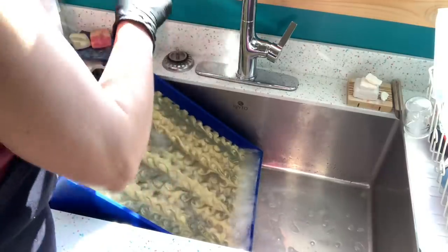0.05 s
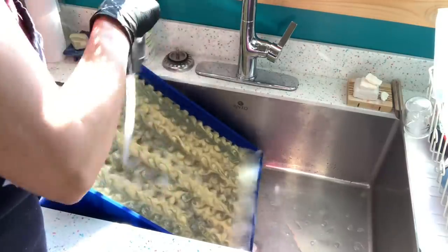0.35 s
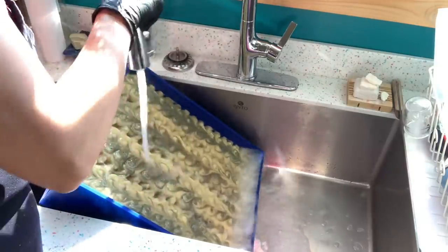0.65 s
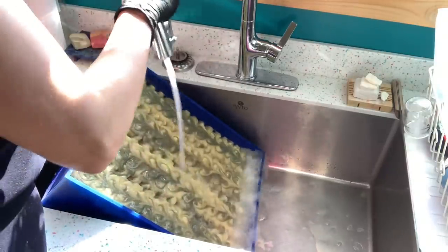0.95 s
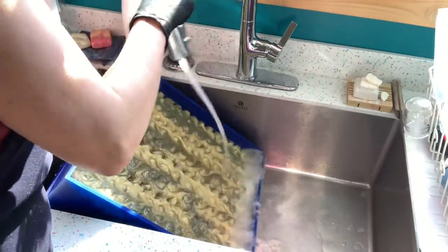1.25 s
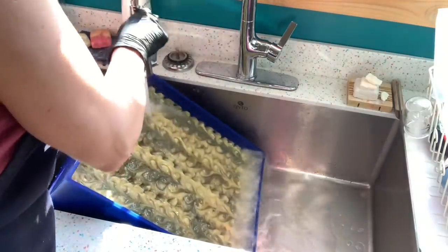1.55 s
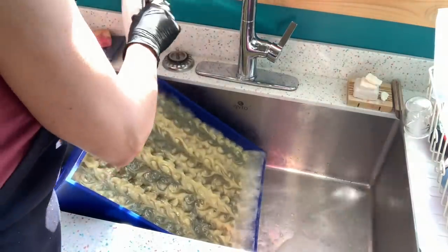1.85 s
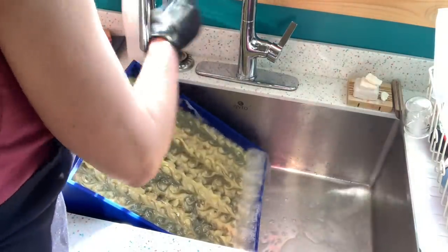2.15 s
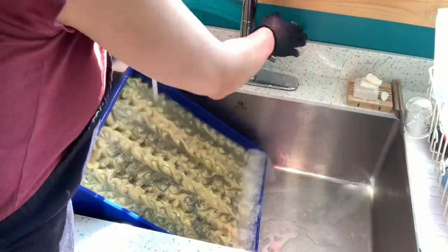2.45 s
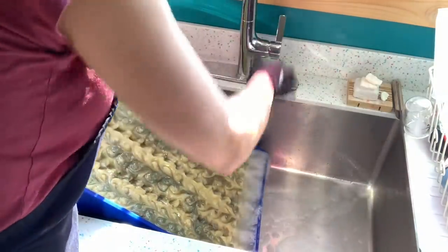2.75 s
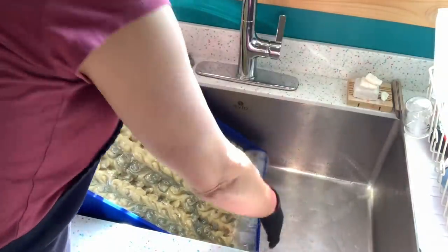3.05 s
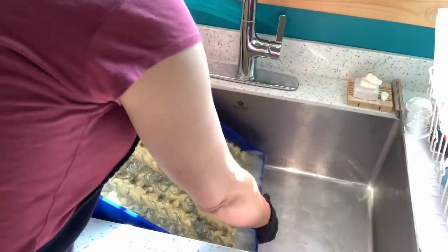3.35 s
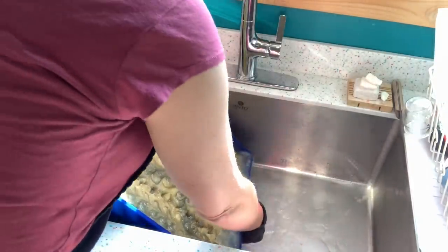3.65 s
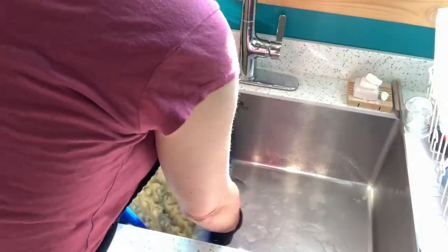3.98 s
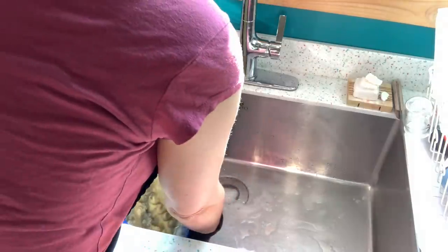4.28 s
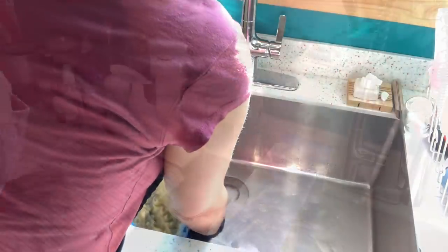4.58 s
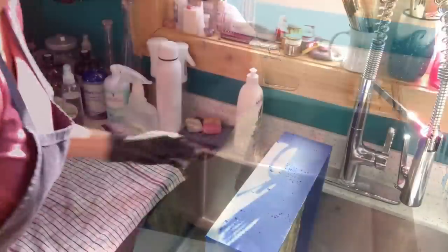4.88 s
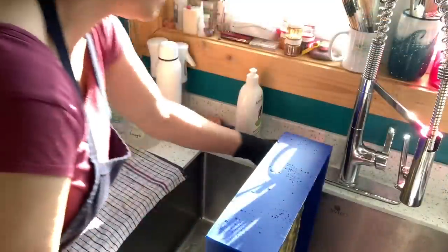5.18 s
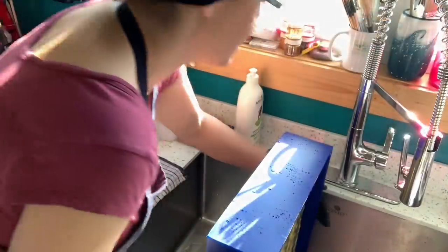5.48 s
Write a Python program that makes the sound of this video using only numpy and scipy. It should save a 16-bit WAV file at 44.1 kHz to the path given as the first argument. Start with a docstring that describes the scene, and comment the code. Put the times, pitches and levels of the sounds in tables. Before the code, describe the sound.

Close up in a small kitchen, fine jets of water hiss and spit on wet soap in a tray inside a steel sink. A sharp clunk marks the sprayer being docked, then the tap closes with a thud and the flow breaks into drips. Quieter handling follows: the plastic tray bumps the basin, tips off a short pour of water and knocks again, over faint glove rubbing and room noise.

```python
"""Water fizzes and splatters as a pull-down sprayer rains on a soap loaf in a plastic tray in a steel sink.
The drops keep tray and basin ringing. The spray head clunks into its dock, the tap thumps shut
and the hose dribbles dry. The tray is shifted and tipped: its water gushes off, then it knocks
against the sink. Behind it: wet gloves, bursting suds and the rumble and hiss of a small kitchen."""
import sys
import numpy as np
from scipy import signal
from scipy.fft import rfft, irfft, next_fast_len
from scipy.io import wavfile
from scipy.ndimage import uniform_filter1d

SR = 44100
rng = np.random.default_rng(int(sys.argv[2]) if len(sys.argv) > 2 else 0)


def bounce(signal):
    """Save signal as a 16-bit WAV file at the path given by the first command-line argument."""
    frames = np.transpose(np.atleast_2d(signal))
    limited = np.clip(frames, -1, 1)
    pcm = np.round(limited * 32767).astype(np.int16)
    wavfile.write(sys.argv[1], SR, pcm)


N = 247842
TIME = np.arange(N) / SR
BINS_HZ = np.fft.rfftfreq(4096, 1 / SR)
SHUT_S, BREAK_S = 2.557, 2.67  # tap closes, jet breaks up
PORT_GAP_S = 0.00019  # travel time between the two microphone ports

# Fine jets on soap: freq_hz, level_db
FIZZ_SPECTRUM = [(1500, -18.5), (2600, -35.5), (3600, -1.5), (5000, -8.5), (6200, -2), (8000, 4.5),
                 (10000, 1), (12000, 3.6), (13500, -1.5), (15000, 3.5), (16000, -4.5)]
# Bigger drops in the basin: freq_hz, level_db
SPLATTER_SPECTRUM = [(250, -12.5), (680, -7.5), (850, -1), (1150, -4), (1600, -2), (2400, -3.7),
                     (3200, 3.5), (4000, 5.3), (5300, 1.5), (6500, 1), (9000, -22.5), (16000, -15.5)]
# Faint narrow peaks colouring the spray's hiss: pitch_hz, width_hz, level_db
SPRAY_PEAKS = [(3770, 81, -29.5), (4570, 68, -10), (5460, 30, 0.5), (7060, 59, -12), (8400, 62, -2)]
# Jet swept over the soap and back to the dock: time_s, level_db
JET_SWEEP = [(0, -45.5), (.45, -45), (.7, -43), (1.2, -43), (1.27, -45), (1.385, -39.5), (1.46, -45),
             (1.62, -47.5), (2.1, -48), (2.55, -47)]
def spray():
    """Fine jets fizz on the wet soap; bigger drops splatter inside the basin."""
    peaks = sum(amp(db) / (1 + (2 * (BINS_HZ - hz) / width_hz) ** 2) for hz, width_hz, db in SPRAY_PEAKS)
    peak_db = 20 * np.log10(1 + peaks)
    fizz = patter(per_s=3500, spread_db=1.5, wash=1, clump_db=1, clump_hz=14)
    fizz = colour(fizz, curve(FIZZ_SPECTRUM) + peak_db)
    splatter = patter(per_s=1200, spread_db=2, wash=1, clump_db=1, clump_hz=3.7)
    splatter = colour(splatter, curve(SPLATTER_SPECTRUM) + peak_db)
    sweep_db = np.interp(TIME, *np.transpose(JET_SWEEP))
    rim_db = 3.7 * np.exp(-((TIME - 1.47) / 0.1) ** 2)  # jet crosses the tray's rim
    fizz = wander(fizz, depth_db=2, patch_hz=885, patch_s=0.049)
    fizz *= amp(sweep_db + 5.5) * flow() ** 0.97
    splatter = wander(splatter, depth_db=3.5, patch_hz=403, patch_s=0.045)
    splatter *= amp(-46.5 + 0.18 * (sweep_db - sweep_db[0]) + rim_db) * flow(lead_s=0.0063)
    return (place(fizz, lag_ms=0.2656, wet_db=-13, left_db=0)
            + place(splatter, lag_ms=-0.14, wet_db=-1, left_db=2))


def flow(lead_s=0):
    """Jet gain: full until the tap shuts, then it weakens and breaks."""
    shut_db_per_s, break_db_per_s = 105, 400
    return amp(-shut_db_per_s * since(SHUT_S - lead_s) - break_db_per_s * since(BREAK_S))


# Water breaking on an edge: start_s, level_db, centre_hz, width_oct, t60_s
EDGE_SPITS = [(0.121, -49, 2020, .6, 0.05), (.781, -51.5, 2000, 0.43, 0.054),
              (0.974, -37.5, 4400, 0.94, 0.086), (1.288, -42.5, 1940, 1.1, 0.15),
              (1.319, -31, 4800, 0.9, 0.1), (1.388, -37.5, 1900, 2.9, 0.12),
              (1.393, -47.5, 8000, 0.66, 0.052), (1.442, -45, 4100, 0.41, .06),
              (1.503, -34.5, 3630, 0.55, 0.07), (4.056, -68, 3200, 0.8, .07)]
def spits(rise_s=0.002, droplets_per_s=3000):
    """A slug of water bursts into a tight cluster of droplets that dies quickly."""
    out, t = np.zeros(N), np.arange(SR // 5) / SR
    for start_s, level_db, centre_hz, width_oct, t60_s in EDGE_SPITS:
        droplets = rng.standard_normal(len(t)) * (rng.random(len(t)) < droplets_per_s / SR)
        cluster = unit_rms(colour(droplets, hump(centre_hz, width_oct)))
        add(out, start_s, cluster * amp(level_db - 60 * t / t60_s) * (1 - np.exp(-t / rise_s)))
    return place(out, lag_ms=0.071, wet_db=-14, left_db=1.5)


# Single large drops: start_s, level_db, centre_hz, width_oct
LARGE_DROPS = [(0.366, -23.5, 10800, 0.43), (0.460, -23, 9550, 0.5), (0.577, -21.5, 10400, 0.6),
               (.637, -24, 9000, .7), (1.039, -25.5, 7040, 0.68), (1.143, -40, 8400, 0.37),
               (1.28, -25, 9000, 1), (1.308, -24, 8500, 1), (1.340, -23, 9500, 1), (1.362, -25.5, 7700, 1),
               (1.386, -21.5, 8200, 0.77), (2.103, -30.5, 8000, 0.48), (2.725, -50, 4240, 0.13),
               (2.739, -49, 4400, .12), (2.841, -44, 8100, .12), (2.856, -47, 4560, .1),
               (2.921, -43, 8500, 0.089), (2.959, -48, 8500, .1), (3.014, -44.5, 10300, 0.11),
               (3.049, -49, 11400, 0.21), (3.147, -61, 7850, 0.16), (3.245, -53.5, 8150, 0.37),
               (3.833, -50, 8000, 0.27), (3.871, -46, 8000, 0.48), (3.902, -45, 8200, 0.063),
               (3.913, -60, 1910, 0.18), (3.949, -55, 2150, 0.1), (4.027, -53, 7500, .15),
               (4.039, -53, 1710, 0.31), (4.08, -53, 8500, .5), (4.167, -57, 7900, .2),
               (4.257, -60, 9200, .15), (4.324, -60.5, 8300, 0.29)]
def drops():
    """Large drops snap on the wet soap; the narrow-band ones plink like a trapped bubble."""
    out = np.zeros(N)
    for start_s, level_db, centre_hz, width_oct in LARGE_DROPS:
        add(out, start_s, click(level_db, centre_hz, width_oct, t60_s=0.016))
    return place(out, lag_ms=0.267, wet_db=-10, left_db=0)


# Modes of the sink with the tray in it: pitch_hz, level_db, t60_s
SINK_MODES = [(46, -5, 0.25), (69.9, 2.5, 0.26), (91.1, -2.5, 0.49), (110.3, -10, 0.19), (140.4, 3, 0.24),
              (175.7, 1, 0.15), (200.7, 1.5, 0.24), (265, -7.5, 0.13), (323.4, -5.5, 0.31),
              (336, -0.5, 0.076), (471.4, 4.5, 0.24), (527, -18.5, 0.35), (624.5, -6, 0.062),
              (837, -18.5, 0.22), (1070, -2.5, 0.091), (1216, -1.5, 0.11), (1308, -1.5, 0.1)]
def drumming():
    """Falling water keeps the sink's modes and the tray's hollow note ringing."""
    mode_power = sum(amp(db) ** 2 / (1 + ((BINS_HZ - hz) * t60_s / 1.1) ** 2)
                     for hz, db, t60_s in SINK_MODES)
    basin = patter(per_s=650, spread_db=3, wash=0.78, clump_db=0.5, clump_hz=16)
    basin = unit_rms(colour(basin, 10 * np.log10(mode_power)))
    tray = patter(per_s=290, spread_db=-1, wash=0.12, clump_db=-1.5, clump_hz=11)
    tray = unit_rms(colour(tray, hump(469, 0.11)))
    push = amp(-55) * flow() + amp(-73.5) * draining()
    return (place(basin * push, lag_ms=-0.084, wet_db=-12.5, left_db=2.5)
            + place(amp(-4.5) * tray * push, lag_ms=-0.63, wet_db=-4.5, left_db=1))


# Dull blows on the sink: start_s, level_db, centre_hz, width_oct, rise_s, rattle_db, sway_db
SINK_BLOWS = [(1.596, -43, 127, 1.3, 0.0036, 4, -14), (1.777, -32, 460, 1.1, 0.0028, -2.5, -4.5),
              (1.784, -28, 125, 1, .004, -8, -18), (1.849, -31, 149, .45, 0.0062, -4, -5),
              (1.917, -38.5, 266, 0.83, 0.0037, -1, -6), (2.503, -40, 480, .5, 0.0067, -15, -14),
              (2.553, -33.5, 376, 0.62, 0.0026, -15, -7), (2.562, -35, 202, .25, 0.0027, -3, -5),
              (2.588, -37.5, 470, 0.23, 0.0025, -13, -22), (2.645, -44.5, 183, .4, .003, -2, -1),
              (2.776, -51, 195, 0.37, 0.0095, -1.5, -14), (2.954, -49.5, 195, 0.27, 0.0092, -6, -11),
              (3.425, -41, 193, .4, 0.035, -8, -18), (3.49, -40, 123, 1.5, 0.0069, -7, -20),
              (3.603, -44.5, 159, 0.91, 0.0019, -5, -13), (4.035, -49, 189, 0.55, 0.0085, -12, -22),
              (4.198, -45, 100, 0.75, .004, -6.5, -21), (4.457, -52, 86.6, 0.48, 0.0025, -11.5, -13),
              (4.799, -50.5, 199, 0.95, 0.0024, 3.5, 0.5), (4.822, -38.5, 50.4, .7, 0.0033, 0, -20),
              (4.949, -59, 68.5, 0.89, .004, 2.5, -11)]
def thumps(sway_delay_s=0.018, sway_pitch_ratio=0.36):
    """Each blow is followed by the lower sway of the heavy basin."""
    out = np.zeros(N)
    for start_s, level_db, centre_hz, width_oct, rise_s, rattle_db, sway_db in SINK_BLOWS:
        add(out, start_s, blow(level_db, centre_hz, width_oct, rise_s, rattle_db))
        sway_hz = centre_hz * sway_pitch_ratio
        sway = blow(level_db + sway_db, sway_hz, width_oct=0.66, rise_s=rise_s, rattle_db=2)
        add(out, start_s + sway_delay_s, sway)
    return place(out, lag_ms=-0.25, wet_db=-5.5, left_db=0)


def blow(level_db, centre_hz, width_oct, rise_s, rattle_db, rattle_t60_s=0.13):
    """A blow rings the sink's modes near centre_hz and rattles loose parts."""
    t = np.arange(SR // 2) / SR
    mode_hz, mode_db, t60_s = np.transpose(SINK_MODES)[:, :, None]
    weights = amp(mode_db + hump(centre_hz, width_oct, mode_hz))
    modes = weights * amp(-60 * t / t60_s) * np.sin(2 * np.pi * mode_hz * t)
    ring = modes.sum(0) / np.linalg.norm(weights)
    rattle = unit_rms(colour(rng.standard_normal(len(t)), hump(centre_hz, 0.87)))
    rattle *= amp(rattle_db - 60 * t / rattle_t60_s)
    return amp(level_db - 5) * (ring + rattle) * (1 - np.exp(-t / rise_s))


# Contacts of spray head, lever and tray: start_s, level_db, centre_hz, width_oct, t60_s
HARD_KNOCKS = [(0.035, -38, 1500, 0.72, 0.15), (1.7723, -23.5, 7280, 0.082, .016),
               (1.773, -24, 5570, 0.65, 0.056), (1.778, -32, 7400, 0.15, 0.044),
               (1.779, -37, 1310, 0.54, 0.062), (1.916, -45, 750, 0.32, 0.078),
               (2.786, -52, 1430, 1.9, 0.036), (2.883, -41, 2700, 0.37, .008),
               (3.408, -48, 2900, 0.72, 0.23), (3.436, -53, 2240, 0.71, 0.1),
               (3.546, -53.5, 3900, .5, 0.033), (3.604, -57, 980, 0.22, 0.025),
               (3.753, -53.5, 1030, 0.28, 0.19), (4.004, -45, 1670, 0.23, 0.11),
               (4.802, -39.5, 2450, 0.75, 0.025), (4.806, -55, 3530, 0.56, .2),
               (4.983, -60, 3960, 0.29, 0.053)]
def knocks():
    """Metal and plastic parts meet at the basin's rim, near and dry."""
    out = np.zeros(N)
    for start_s, level_db, centre_hz, width_oct, t60_s in HARD_KNOCKS:
        add(out, start_s, click(level_db + 1, centre_hz, width_oct, t60_s))
    return place(out, lag_ms=-0.1, wet_db=-8, left_db=0.8)


def click(peak_db, centre_hz, width_oct, t60_s):
    """A sharp contact, then a band of decaying noise for its many close, damped modes."""
    t = np.arange(SR // 6) / SR
    envelope = amp(-60 * t / t60_s) + 2.4 * np.exp(-t / 0.0032)
    burst = colour(rng.choice([-1, 1], len(t)) * envelope, hump(centre_hz, width_oct))
    return amp(peak_db) * burst / np.abs(burst).max()


# Last water on the soap: freq_hz, level_db
DRIBBLE_SPECTRUM = [(300, -8), (700, 1), (1500, -4.5), (2400, -1.5), (3200, -1.5), (4500, -0.5), (6000, 0),
                    (8500, 2), (10500, 0.5), (13000, -5), (16000, -7)]
def dribble():
    """The hose empties onto the soap as a broken string of drops."""
    impacts = patter(per_s=250, spread_db=2.5, wash=0.89, clump_db=0, clump_hz=54)
    impacts = colour(impacts, curve(DRIBBLE_SPECTRUM))
    impacts = wander(impacts, depth_db=2.5, patch_hz=497, patch_s=0.024)
    return place(amp(-58) * impacts * draining(), lag_ms=0.17, wet_db=5, left_db=3)


def draining(sag_s=0.42, sag_db_per_s=7, empty_db_per_s=52):
    """Gain of the water left in the hose: it takes over from the jet, sags and runs dry."""
    return (1 - flow()) * amp(-sag_db_per_s * since(SHUT_S) - empty_db_per_s * since(SHUT_S + sag_s))


# Sheet of water off the tray: freq_hz, level_db
SHEET_SPECTRUM = [(100, -2), (200, 0), (330, -12), (480, -2.5), (680, -3), (810, -3), (900, 0), (1000, -3),
                  (1300, -6.5), (1500, -13.5), (1700, -9), (2200, -19), (3000, -20), (8000, -22)]
# Fine splashes on steel: freq_hz, level_db
SPLASH_SPECTRUM = [(1000, -18), (2500, -1.5), (4500, -2), (7000, -7.5), (8300, 4.5), (9800, -13),
                   (12000, -3), (16000, -12)]
def pour():
    """A sheet of water slides off the hollow, ringing tray; fine splashes come with its front."""
    sheet = patter(per_s=1200, spread_db=2.5, wash=0.64, clump_db=1, clump_hz=23)
    sheet = colour(sheet, curve(SHEET_SPECTRUM))
    tray = patter(per_s=300, spread_db=1.5, wash=0.34, clump_db=3, clump_hz=10)
    tray = amp(-1.5) * unit_rms(colour(tray, hump(799, 0.045)))
    splashes = patter(per_s=1400, spread_db=5, wash=0.66, clump_db=3, clump_hz=25)
    splashes = colour(splashes, curve(SPLASH_SPECTRUM))
    sheet = amp(4) * wander(sheet, depth_db=2.5, patch_hz=198, patch_s=0.021)
    splashes = amp(-2.5) * wander(splashes, depth_db=4.5, patch_hz=704, patch_s=0.04)
    water = (sheet + tray) * runoff() + splashes * runoff(lead_s=0.036)
    return place(water, lag_ms=-0.031, wet_db=4.5, left_db=0)


# Gushes off the tipped tray: start_s, rise_s, crest_db, ebb_db_per_s
TRAY_GUSHES = [(3.461, 0.12, -69.5, 105), (3.735, 0.26, -60, 59)]
def runoff(lead_s=0):
    """Gain of the flow off the tray: each gush swells to its crest and ebbs."""
    gain = np.zeros(N)
    for start_s, rise_s, crest_db, ebb_db_per_s in TRAY_GUSHES:
        onset_s = start_s - lead_s
        gain += ramp(onset_s, rise_s) * amp(crest_db - ebb_db_per_s * since(onset_s + rise_s))
    return gain


def drips(per_s=170, low_hz=2400, high_hz=12000, life_cycles=26, glide=0.19, candidates=2400):
    """Drips trap small bubbles, each ringing briefly with a rising pitch."""
    out, t = np.zeros(N), np.arange(1500) / SR
    for when, pitch, size, chance in rng.random((candidates, 4)):
        if chance < per_s * N / SR / candidates:
            onset_hz = low_hz * (high_hz / low_hz) ** pitch
            age = onset_hz * t / life_cycles
            pitch_hz = onset_hz * (1 + glide * np.tanh(age))
            bubble = np.sin(2 * np.pi * np.cumsum(pitch_hz) / SR) * np.exp(-2 * age)
            add(out, when * N / SR, amp(-4 * np.log(size + 0.024)) * bubble)
    return place(unit_rms(out) * dripping(), lag_ms=-0.042, wet_db=2, left_db=0.5)


def dripping(linger_s=0.027):
    """Drip gain: follows jet, dribble and gushes, and lingers after them."""
    water = amp(-68.5) * (flow() + draining()) + amp(-17.5) * runoff()
    pole = np.exp(-1 / (linger_s * SR))
    return signal.lfilter([1 - pole], [1, -pole], water)


# Wet gloves and clothes: middle_s, level_db, centre_hz, length_s
GLOVE_RUBS = [(2.922, -63.5, 5800, .11), (3.548, -74, 8100, 0.063), (3.733, -69, 4800, 0.14),
              (3.878, -66.5, 6950, 0.074), (4.05, -63.5, 3220, 0.071), (4.779, -73.5, 7400, 0.13),
              (4.79, -61, 1090, 0.035), (5.224, -81, 1390, .4), (5.221, -82.5, 7000, .3),
              (5.568, -71.5, 10130, 0.099)]
def rubs(snaps_per_s=3000, spread_db=0.5):
    """Each rub is a swell of tiny sticky snaps."""
    out = np.zeros(N)
    for middle_s, level_db, centre_hz, length_s in GLOVE_RUBS:
        n = int(length_s * SR)
        sizes = amp(spread_db * np.minimum(rng.exponential(1, SR), 4)[:n])
        chance = rng.uniform(-1, 1, SR)[:n]
        snaps = sizes * np.sign(chance) * (np.abs(chance) < snaps_per_s / SR)
        swell = unit_rms(colour(snaps, hump(centre_hz, 0.63))) * np.hanning(n)
        add(out, middle_s - length_s / 2, amp(level_db + 1.5) * swell)
    return place(out, lag_ms=-0.1, wet_db=42, left_db=3)


def foam():
    """Suds on the soap burst with faint, high ticks."""
    ticks = patter(per_s=200, spread_db=-4.5, wash=0.84, clump_db=6, clump_hz=4.2)
    ticks = unit_rms(colour(ticks, hump(8700, 1)))
    return place(amp(-81.5) * ticks, lag_ms=-0.047, wet_db=9, left_db=3)


# House rumble: freq_hz, level_db
RUMBLE_SPECTRUM = [(20, -22), (40, -3), (60, 3.5), (90, -4.5), (140, -4), (200, -5), (300, -10.5),
                   (420, -13.5), (900, -21), (3000, -67.5)]
def rumble():
    """Low, slightly wavering noise of the house."""
    noise = unit_rms(colour(rng.standard_normal(N), curve(RUMBLE_SPECTRUM)))
    return place(noise * amp(-72 + 0.5 * waver(7)), lag_ms=-0.25, wet_db=-1.5, left_db=1.5)


# Airy room hiss: freq_hz, level_db
HISS_SPECTRUM = [(150, 4), (400, -1), (800, 0), (1100, 5.5), (1800, 1), (2600, -4), (4500, -2.5),
                 (6500, -9), (9000, -19.5), (12000, -35), (16000, -18)]
def hiss(step_s=4.72, step_db=11, fade_db_per_s=6):
    """Faint diffuse hiss that steps up near the end, then eases."""
    coherence = np.clip(np.sinc(2 * BINS_HZ * PORT_GAP_S), -1, 0.98)
    mid = colour(rng.standard_normal(N), curve(HISS_SPECTRUM) + 10 * np.log10(1 + coherence))
    side = colour(rng.standard_normal(N), curve(HISS_SPECTRUM) + 10 * np.log10(1 - coherence))
    mid, side = unit_rms(mid), amp(-3) * unit_rms(side)
    level_db = -81 + step_db * ramp(step_s, 0.044) - fade_db_per_s * since(step_s) + 0.5 * waver(5)
    return unit_rms(np.array([mid + side, mid - side])) * amp(level_db)


# Kitchen reverberation: freq_hz, t60_s
KITCHEN_DECAY = [(100, 1), (500, 0.27), (2000, 0.4), (6000, 0.13), (16000, 0.052)]
def room_response(basin_db=13.5, basin_t60_s=0.029):
    """Early echoes between the steel walls over the kitchen's tail, alike at both ports in the bass."""
    hz, t, noise = signal.stft(rng.standard_normal((2, SR // 3)), SR, nperseg=256)
    coherence = np.sinc(2 * hz * PORT_GAP_S)[:, None]
    noise[1] = coherence * noise[0] + np.sqrt(1 - coherence ** 2) * noise[1]
    decay = amp(-60 * t / curve(KITCHEN_DECAY, hz)[:, None]) + amp(basin_db - 60 * t / basin_t60_s)
    decay[:, 0] = 0
    decay /= np.linalg.norm(decay, axis=1, keepdims=True)
    response = signal.istft(noise * decay, SR, nperseg=256)[1]
    response = np.array([whiten(port) for port in response])
    return response / np.linalg.norm(response[0])


def whiten(response):
    """Flattens an echo's spectrum, so it adds space but no pitch."""
    power = uniform_filter1d(np.abs(rfft(response, 16384)) ** 2, size=15)[::4]
    return colour(response, -10 * np.log10(power + 1e-9))


def place(x, lag_ms, wet_db, left_db):
    """Stereo image: the left port lags by lag_ms; the echoes shift as hands and water move."""
    phases = 2 * np.pi * (TIME + np.arange(4)[:, None] / 4) + waver(5.7) / 2
    fades = np.maximum(np.cos(phases), 0)  # equal-power crossfade of four responses
    echoes = sum(signal.oaconvolve((fade * x)[None], room_response(), axes=1)[:, :N] for fade in fades)
    size = next_fast_len(N + SR // 10)
    delay = np.exp(-2j * np.pi * np.fft.rfftfreq(size, 1 / SR) * lag_ms / 1000)
    left = irfft(rfft(x, size) * delay, size)[:N]
    stereo = (np.array([left, x]) + amp(wet_db) * echoes) / np.hypot(1, amp(wet_db))
    return stereo * amp([[left_db / 2], [-left_db / 2]])


def patter(per_s, spread_db, wash, clump_db, clump_hz):
    """Uneven droplet impacts over a wash of countless tiny ones, swelling in clumps."""
    sizes = amp(spread_db * np.minimum(rng.exponential(1, N), 5)) * rng.choice([-1, 1], N)
    impacts = unit_rms(sizes * (rng.random(N) < per_s / SR))
    return (impacts + wash * rng.standard_normal(N)) * amp(clump_db * waver(clump_hz))


def wander(x, depth_db, patch_hz, patch_s):
    """Each spot the water hits has its own colour: random patches over time and pitch, rms 1."""
    hz, t, spectrum = signal.stft(x, SR, nperseg=512)
    per_hz, per_s = np.fft.fftfreq(len(hz), hz[1])[:, None], np.fft.fftfreq(len(t), t[1])
    blur = np.exp(-(per_hz * patch_hz) ** 2 - (per_s * patch_s) ** 2)
    patches = unit_rms(np.fft.ifft2(np.fft.fft2(rng.standard_normal(spectrum.shape)) * blur).real)
    return unit_rms(signal.istft(spectrum * amp(depth_db * patches), SR, nperseg=512)[1][:N])


def waver(corner_hz):
    """Random fluctuation of rms 1 above 4 Hz, rolling off past corner_hz."""
    t = np.arange(2400) / 400
    hz = np.fft.rfftfreq(len(t), t[1])
    spectrum = rfft(rng.standard_normal(len(t))) * (hz > 4) / (1 + (hz / corner_hz) ** 2)
    return np.interp(TIME, t, unit_rms(irfft(spectrum)))


def colour(x, gain_db):
    """Minimum-phase filter shaped by gain_db at BINS_HZ, peak gain 1."""
    cepstrum = irfft(np.log(amp(np.maximum(gain_db - gain_db.max(), -90))))
    half = len(cepstrum) // 2
    cepstrum[1:half] *= 2
    cepstrum[half + 1:] = 0
    return signal.oaconvolve(x, irfft(np.exp(rfft(cepstrum))))[:len(x)]


def hump(centre_hz, width_oct, hz=BINS_HZ):
    """Resonance in dB with straight skirts."""
    return -12 * (np.sqrt(1 + (np.log2((hz + 1) / centre_hz) / width_oct) ** 2) - 1)


def curve(points, hz=BINS_HZ):
    """Table interpolated over log frequency."""
    point_hz, values = np.transpose(points)
    return np.interp(np.log(hz + 1), np.log(point_hz), values)


def add(mix, start_s, sound):
    """Mixes sound in at start_s."""
    part = mix[round(start_s * SR):][:len(sound)]
    part += sound[:len(part)]


def ramp(start_s, length_s):
    """Linear rise from 0 to 1."""
    return np.clip((TIME - start_s) / length_s, 0, 1)


def since(start_s):
    """Seconds since start_s, zero before."""
    return np.maximum(TIME - start_s, 0)


def amp(db):
    """Decibels to gain."""
    return 10 ** (np.asarray(db) / 20)


def unit_rms(x):
    """Scales to rms 1."""
    return x / np.sqrt(np.mean(x ** 2) + 1e-20)


def scene():
    """Running water, impacts and background, in stereo."""
    water = spray() + spits() + drumming() + dribble() + pour() + drips()
    impacts = thumps() + knocks() + drops()
    background = rubs() + rumble() + hiss() + foam()
    return water + impacts + background


def record(dry, low_hz=36, high_hz=15800):
    """The microphones' bass cut, then a steep treble limit."""
    bass_cut = signal.butter(3, low_hz, "high", fs=SR, output="sos")
    treble_cut = signal.firwin(611, high_hz, window=("kaiser", 9), fs=SR)
    return signal.oaconvolve(signal.sosfilt(bass_cut, dry), treble_cut[None], "same")


dry = scene()
out = record(dry)
bounce(out)
```